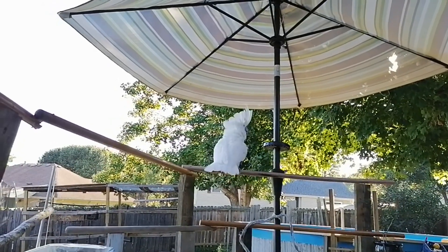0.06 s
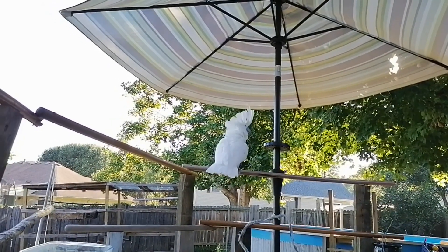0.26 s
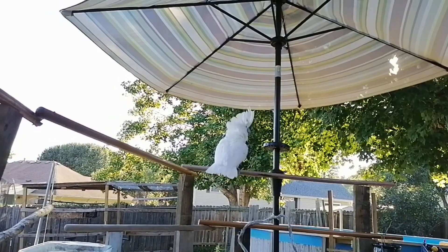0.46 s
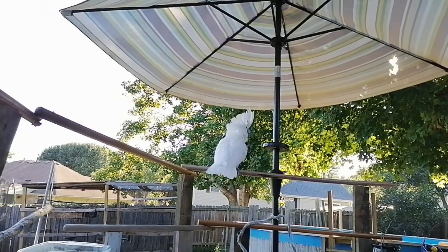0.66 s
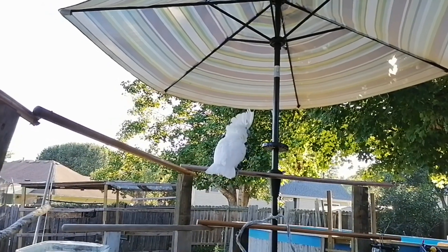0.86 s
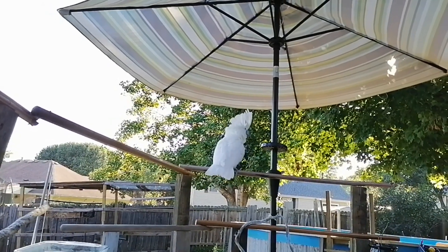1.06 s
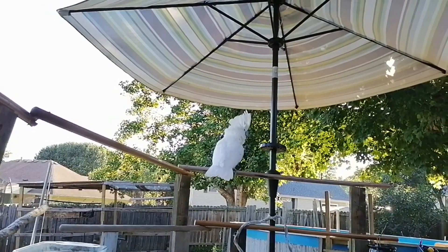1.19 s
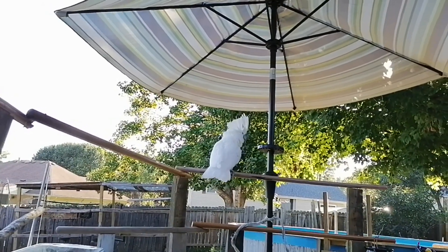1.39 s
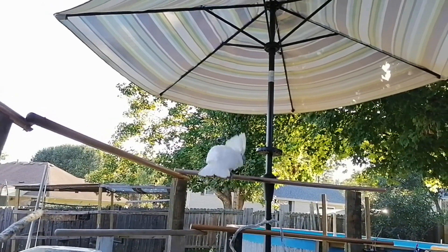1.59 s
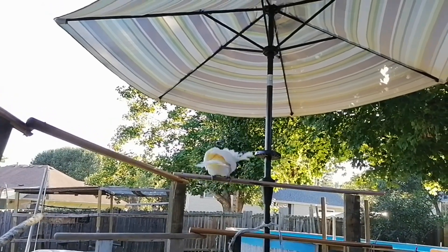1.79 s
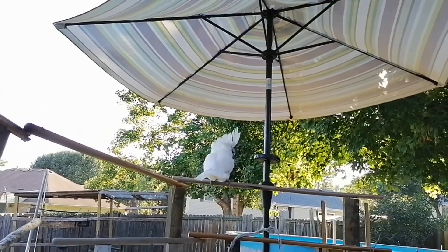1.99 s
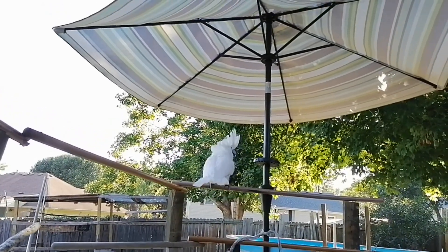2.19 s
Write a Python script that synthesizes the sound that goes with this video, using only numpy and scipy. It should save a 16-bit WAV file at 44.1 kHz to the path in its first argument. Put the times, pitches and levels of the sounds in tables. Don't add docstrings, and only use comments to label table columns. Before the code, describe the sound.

A harsh cockatoo scream fades within the first 0.2 seconds, leaving a low pump hum with thin whine towards the left and faint leafy hiss. Tiny distant peeps come near 0.4, two snappy chirps at 0.8 and 1.0 with a short rising whistle, then an arched whistle at 1.2-1.4. Feathers puff softly at 1.85; a loud, ragged two-toned scream bursts at 1.9 and continues to the end, echoing around the yard.

```python
import sys
import numpy as np
from scipy import signal
from scipy.fft import rfft, irfft, next_fast_len
from scipy.io import wavfile
from scipy.ndimage import uniform_filter1d, map_coordinates

SR = 44100
rng = np.random.default_rng(int(sys.argv[2]) if len(sys.argv) > 2 else 0)


def waveform_to_disk(signal):
    frames = np.transpose(np.atleast_2d(signal))
    scaled = np.clip(frames, -1, 1) * 32767
    samples = np.round(scaled).astype(np.int16)
    wavfile.write(sys.argv[1], SR, samples)


def invert_db(x):
    u = np.asarray(x, float) / 20
    return 10 ** u


N = 99180
T = np.arange(N) / SR
TOP_HZ = 15750
SIDES = np.array([[.5], [-.5]])

# time_s, gain_db
GAIN_CURVE = [
    (0, -6),
    (.08, -3.5),
    (.17, 1.5),
    (1.89, 2.5),
    (1.95, -3.5),
    (2.02, -9),
    (2.25, -8),
]


def unit(x):
    return x / np.sqrt(np.mean(x ** 2) + 1e-20)


def along(points, hz):
    f, v = np.transpose(points)
    return np.interp(np.log(hz + 1), np.log(f + 1), v)


def curves(rows):
    s, *cols = np.transpose(rows)
    return [np.interp(T, s, c) for c in cols]


def gate(start_s, end_s, rise_s, fall_s):
    opening = np.clip((T - start_s) / rise_s, 0, 1)
    closing = np.clip((end_s - T) / fall_s, 0, 1)
    return np.sin(np.pi / 2 * opening * closing) ** 2


def wobble(rate_hz):
    return map_coordinates(rng.standard_normal(8000), [T * rate_hz])


def filtered(x, response):
    m = next_fast_len(N + SR // 8)
    return irfft(rfft(x, m) * response(np.fft.rfftfreq(m, 1 / SR)), m)[..., :N]


def resonances(peaks):
    def response(f):
        return sum((-1) ** k * invert_db(db) * 1j * f * w / (c * c - f * f + 1j * f * w)
                   for k, (c, w, db) in enumerate(peaks))
    return response


def dull(x, top_hz):
    return filtered(x, lambda f: 1 / (1 + 1.4j * f / top_hz - (f / top_hz) ** 2) ** 2)


def tone(hz, tones_db, rough, rate_hz, flutter_db):
    phase = 2 * np.pi * np.cumsum(hz * (1 + rough * wobble(rate_hz))) / SR
    wave = sum(invert_db(db) * np.sin((k + 1) * phase) * ((k + 1) * hz < TOP_HZ)
               for k, db in enumerate(tones_db))
    return np.sqrt(2) * wave * invert_db(flutter_db * wobble(rate_hz))


def place(x, pan_db, lead_s):
    return invert_db(pan_db * SIDES) * filtered(x, lambda hz: np.exp(2j * np.pi * hz * lead_s * SIDES))


def yard(x):
    # hz, t60_s
    decay = [(500, 0.25), (3000, 0.39), (6000, 0.3), (12000, 0.022)]
    hz, t, z = signal.stft(rng.standard_normal((2, SR // 2)), SR, nperseg=256)
    tail = signal.istft(z * invert_db(-60 * t / along(decay, hz)[:, None]), SR, nperseg=256)[1]
    tail = tail / np.linalg.norm(tail[0])
    delayed = np.pad(x, (300, 0))[None]
    return signal.fftconvolve(delayed, tail, axes=1)[:, :N]


def pump():
    # hz, density_db
    rumble = [(22, -58), (38, -4), (81, -10), (140, -4), (233, -0.5), (387, -9), (483, -11.5), (752, -7),
              (1100, -23), (1430, -34), (2420, -120)]
    # hz, width_hz, level_db
    casing = [(170, 24, -11), (238.8, 10, 6.5), (291, 7.7, 4), (406.3, 27.3, 9.5), (672, 28, -5)]
    # hz, share_0_to_1
    likeness = [(40, 0.83), (100, 0.7), (300, 0.91), (700, 0.84), (1200, 0.27)]
    # hz, level_db
    hum = [(86.1, -49)]
    # hz, level_db
    whine = [(1353, -75), (1427, -66.5), (1470.7, -50.5), (1514, -61.5), (1529, -64.5), (1557, -134)]
    pan_db, lead_s = 10, 0.00039

    def colour(hz):
        return invert_db(along(rumble, hz)) * (1 + np.abs(resonances(casing)(hz)))

    def alike(hz):
        return np.clip(along(likeness, hz), 0, 1)

    def steady(lines, rough, rate_hz):
        return sum(invert_db(db) * tone(hz + 0 * T, [0], rough, rate_hz, 2.9) for hz, db in lines)

    shared, left, right = filtered(rng.standard_normal((3, N)), colour)
    throb = invert_db(0.22 * wobble(3.8) + 0.41 * wobble(25.0))
    own = filtered(np.array([left, right]), lambda hz: np.sqrt(1 - alike(hz))) * invert_db(pan_db * SIDES)
    body = place(filtered(shared, lambda hz: np.sqrt(alike(hz))), pan_db, lead_s) + own
    body = invert_db(-40) * throb * body / np.std(body.mean(0))
    hum_wave = place(steady(hum, 0.023, 9.9), 7.2, lead_s)
    whine_wave = place(steady(whine, 0.00025, 5.96), 20.6, lead_s)
    return body + hum_wave + invert_db(-7.0) * whine_wave


def air():
    # hz, density_db
    spectrum = [(500, -52), (900, -0.5), (1230, -2), (1800, -6), (3100, -9), (4500, -16.5), (9500, -15.5),
                (11500, -25), (15600, -29)]
    hiss = filtered(rng.standard_normal((2, N)), lambda hz: invert_db(along(spectrum, hz)))
    return invert_db(-53 + 1.8 * wobble(3.83) + 2.5 * SIDES) * unit(hiss)


def rasp(throat, hit_loss, shift_db):
    pulse_hz, pulse_top_hz, throat_low_hz = 238, 4000, 900
    cycle = np.cumsum(pulse_hz * np.exp(.1 * wobble(150))) / SR
    hits = np.diff(np.floor(cycle), prepend=0) * invert_db(2 * rng.standard_normal(N))
    breath = rng.standard_normal(N) * (4.5 + np.exp(-4 * (cycle % 1)))

    def soft(f):
        return np.sqrt(1 - hit_loss) / (1 + 1.4j * f / pulse_top_hz - (f / pulse_top_hz) ** 2)

    def breathy(f):
        return np.sqrt(1 - np.abs(soft(f)).clip(0, .95) ** 2)

    def throat_floor(f):
        ratio = f / throat_low_hz
        return ratio ** 4 / (1 + 1.2j * ratio - ratio ** 2) ** 2

    source = filtered(unit(hits), soft) + filtered(unit(breath), breathy)
    wave = sum((-1) ** k * invert_db(shift_db * wobble(45)) * filtered(source, resonances([peak]))
               for k, peak in enumerate(throat))
    beat = unit(uniform_filter1d(invert_db(7 * np.exp(-2.5 * (cycle % 1))), size=25))
    return unit(filtered(wave, throat_floor)), beat


def earlier_scream():
    # time_s, level_db
    level = [
        (0, -36),
        (.03, -31.5),
        (.07, -38),
        (.2, -77.5),
    ]
    # hz, width_hz, level_db
    throat = [(1113, 21, 8.5), (2130, 220, 1), (3060, 460, 0), (4580, 930, 1), (5540, 980, -0.5),
              (8850, 3400, -12)]
    undo = invert_db(-curves(GAIN_CURVE)[0])
    voice = invert_db(curves(level)[0]) * dull(rasp(throat, .9, 0)[0], 11500)
    voice = voice * gate(-0.71, 0.2, 1, 0.32) * undo
    ring = invert_db(-38 - 60 * T / 0.16) * tone(2130 + 0 * T, [0], 0.041, 196, 4.8)
    voice = voice + ring * undo
    return place(voice, 0, 0) + invert_db(-6.5) * yard(voice)


def far_calls():
    # start_s, end_s, from_hz, to_hz
    glides = [
        (.385, .405, 3200, 3500),
        (.41, .455, 3100, 3300),
        (1.18, 1.215, 12200, 15200),
        (1.825, 1.9, 5800, 5700),
        (1.75, 1.9, 9200, 9200),
        (1.4, 1.5, 1850, 1750),
    ]
    # level_db, roughness_0_to_1
    levels = [(-66, .06), (-61, .07), (-69, .003), (-75, .035), (-73, .006), (-65, .02)]
    song = 0
    for (s, end, hz0, hz1), (db, rough) in zip(glides, levels):
        hz = np.interp(T, [s, end], [hz0, hz1])
        song = song + invert_db(db) * tone(hz, [0], rough, 600, 6.1) * gate(s, end, 0.0034, 0.012)
    return song


def note(s, length_s, db, hz, scoop, tones_db, rough, rise, drift=.025):
    age_s = np.clip(T - s, 0, length_s)
    pitch_hz = hz * (1 - scoop * np.exp(-age_s / .002) + drift * (age_s / length_s - .5))
    wave = tone(pitch_hz, tones_db, rough, 500, 2.8)
    return invert_db(db) * wave * gate(s, s + length_s, rise * length_s, 0.49 * length_s)


def chirps():
    # start_s, length_s, level_db, pitch_hz
    leads = [
        (0.776, 0.074, -46.5, 2260),
        (0.975, 0.059, -46.5, 2215),
    ]
    lead_tones = [
        [-15, 0, -6.5, -12, -10],
        [-12.5, 0, -13, -4.5, -13],
    ]
    lead_drift = [.07, 0.032]
    # start_s, length_s, level_db, from_hz, to_hz
    whips = [
        (.81, .011, -46, 3600, 11000),
        (1.008, 0.0094, -43, 5300, 5900),
        (.776, 0.05, -56, 7400, 11000),
        (1.012, .012, -49, 6500, 11000),
    ]
    # start_s, length_s, level_db, pitch_hz
    snaps = [
        (0.819, 0.026, -34, 6125),
        (1.018, 0.04, -39.5, 6330),
    ]
    snap_tones = [0, -18.5]
    near = sum(note(*row, .1, tones, .018, .3, drift)
               for row, tones, drift in zip(leads, lead_tones, lead_drift))
    for s, length_s, db, hz0, hz1 in whips:
        hz = np.interp(T, [s, s + length_s], [hz0, hz1])
        whip = tone(hz, [0, -18], .05, 1500, 4.2)
        near = near + invert_db(db) * whip * gate(s, s + length_s, 0.0036, 0.0026)
    hiss = unit(filtered(rng.standard_normal(N), resonances([(5320, 2100, 6.5), (9440, 3700, -20)])))
    for s, length_s, db, hz in snaps:
        near = near + note(s, length_s, db, hz, .05, snap_tones, .017, .04)
        near = near + invert_db(-39.5) * hiss * gate(s - .015, s + 0.025, 0.039, 0.021)
    breath = unit(filtered(rng.standard_normal(N), resonances([(8030, 4300, -2), (12000, 1200, -1)])))
    for s, length_s, db, hz in leads:
        near = near + invert_db(-58) * breath * gate(s - .003, s + length_s + 0.064, 0.0067, 0.051)
    return dull(near, 14300)


def whistles():
    # time_s, pitch_hz, level_db
    calls = [
        [(.8, 2100, -64), (.828, 2384, -49), (.838, 2553, -54), (.854, 2536, -39.5), (.868, 2700, -48.5),
         (.884, 2848, -37.5), (.894, 2790, -40.5), (.906, 2860, -66)],
        [(1.19, 2230, -50.5), (1.215, 2460, -48), (1.248, 2631, -53), (1.266, 2658, -44), (1.304, 2645, -38.5),
         (1.33, 2525, -58), (1.362, 2346, -38.5), (1.39, 2130, -55), (1.43, 1880, -50.5)],
    ]
    overtones_db = [0, -32, -60, -60, -35]
    # delay_s, level_db
    fences = [
        (.028, -11),
        (.052, -14),
    ]
    song = 0
    for rows in calls:
        hz, db = curves(rows)
        wave = tone(hz, overtones_db, .007, 150, 2.6)
        song = song + invert_db(db) * wave * gate(rows[0][0], rows[-1][0], 0.0056, 0.005)
    return song + sum(invert_db(db) * np.roll(song, round(s * SR)) for s, db in fences)


def birds():
    song = far_calls() + whistles()
    near = chirps()
    near_both = place(near, 6.3, .00002) + invert_db(-5.5) * yard(near)
    return near_both + place(song, 1.0, .00002) + invert_db(-10) * yard(song)


def scream():
    # time_s, effort_db
    effort = [
        (1.87, -45),
        (1.89, -48.5),
        (1.91, -32),
        (1.944, -25),
        (2.0, -23),
        (2.04, -26),
        (2.1, -24),
        (2.18, -23),
        (2.249, -22.5),
    ]
    # hz, width_hz, level_db
    throat = [(1100, 1040, -7.5), (1530, 475, -2), (2015, 360, 3), (2330, 580, 1.5), (2700, 295, 0),
              (3080, 540, -4), (4620, 240, -6.5), (5230, 320, -5.5), (6830, 750, -12.5), (8770, 570, -26.5),
              (11000, 2000, -36), (15600, 1900, -27)]
    # time_s, pitch_hz, level_db
    membrane_a = [(1.9, 1372, -36), (1.904, 1383, -41), (2.104, 1525, -28.5), (2.116, 1431, -48.5),
                  (2.154, 1568, -37), (2.212, 1490, -29.5), (2.249, 1510, -34)]
    # time_s, pitch_hz, level_db
    membrane_b = [(1.899, 2122, -47), (1.931, 1931, -30), (2.093, 1882, -32), (2.1, 2015, -31),
                  (2.13, 2062, -27), (2.234, 1890, -26), (2.249, 2025, -47)]
    # time_s, pitch_hz, level_db
    low_strand = [(1.89, 760, -45), (1.93, 930, -39), (1.999, 1040, -54), (2.062, 1100, -40),
                  (2.249, 1170, -42)]
    # time_s, pitch_hz, level_db
    high_strand = [(1.9, 2889, -73.5), (1.936, 2878, -42), (2.183, 3087, -31.5), (2.202, 2852, -49),
                   (2.24, 3146, -33), (2.249, 2928, -32)]
    # start_s, end_s, hz, width_hz, level_db
    puff = (1.822, 1.905, 5750, 800, -56.5)
    # hz, pan_db
    pan = [(800, 2), (1650, -5), (2400, 0), (3400, 2), (5000, -4), (7200, -6), (8400, 10), (11000, 9),
           (13000, -1)]
    wave, beat = rasp(throat, .15, 1.5)
    voice = invert_db(curves(effort)[0] - 3) * wave
    for strand in (membrane_a, membrane_b, low_strand, high_strand):
        hz, db = curves(strand)
        ringing = beat * tone(hz, [0, -20, -24], .015, 130, 3.5)
        voice = voice + invert_db(db - 2.0) * ringing * gate(1.89, 3, 0.016, 0.764)
    opened = gate(1.895, 3, 0.043, .01)
    voice = opened * voice + (1 - opened) * dull(voice, 3620)
    voice = voice * gate(1.87, 3, 0.017, 0.58) * invert_db(-curves(GAIN_CURVE)[0])
    s, end, hz, width_hz, db = puff
    feathers = filtered(rng.standard_normal(N), lambda f: resonances([(hz, width_hz, 0)])(f) ** 2)
    voice = voice + invert_db(db) * gate(s, end, 0.013, 0.017) * unit(feathers)
    both = place(voice, 0, -.00002) + invert_db(-4) * yard(voice)
    return filtered(both, lambda f: invert_db(along(pan, f) * SIDES))


def scene():
    return pump() + air() + earlier_scream() + birds() + scream()


def top_cut(x):
    return signal.sosfilt(signal.butter(12, 15780, fs=SR, output="sos"), x)


def record(dry):
    def colour(f):
        return (1 - 0.49 * resonances([(3863, 610, 0)])(f)) * (f < TOP_HZ)

    mix = filtered(dry * invert_db(curves(GAIN_CURVE)[0]), colour)
    return top_cut(mix)


dry = scene()
out = record(dry)
waveform_to_disk(out)
```